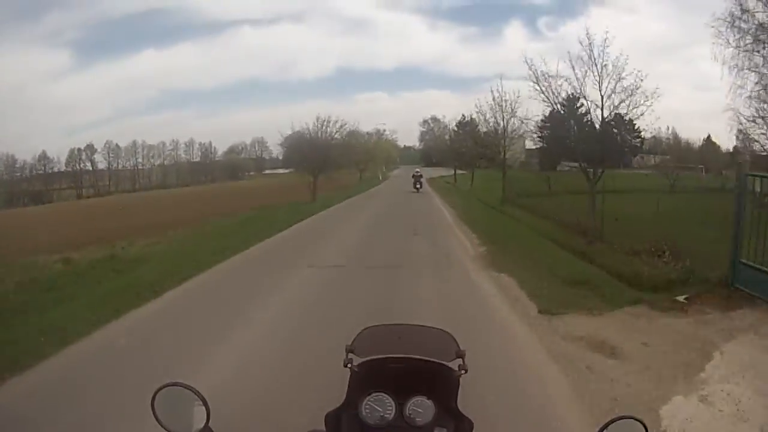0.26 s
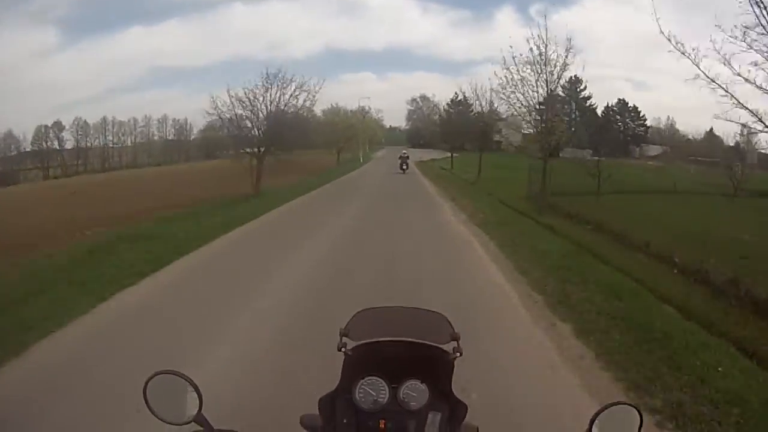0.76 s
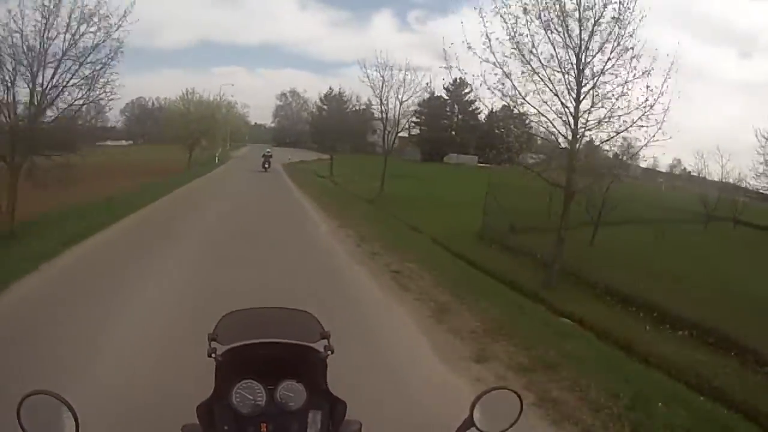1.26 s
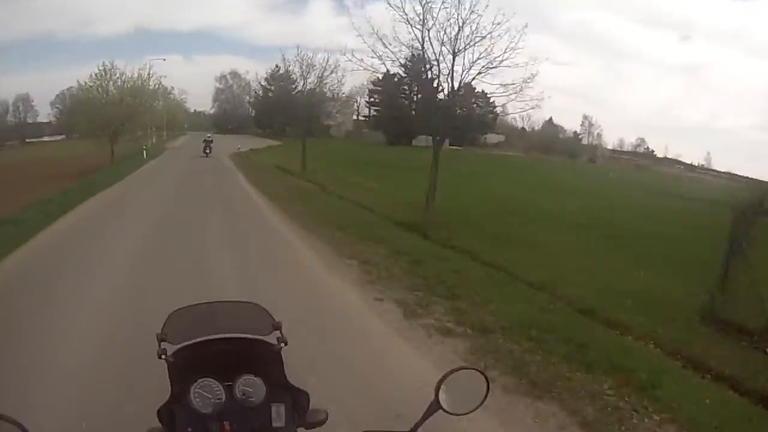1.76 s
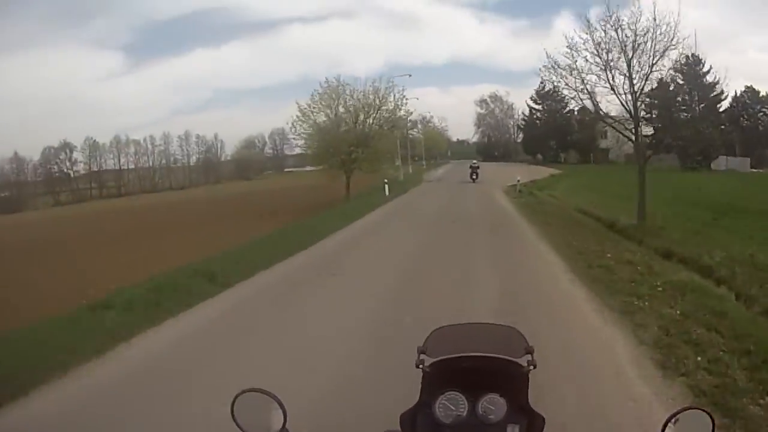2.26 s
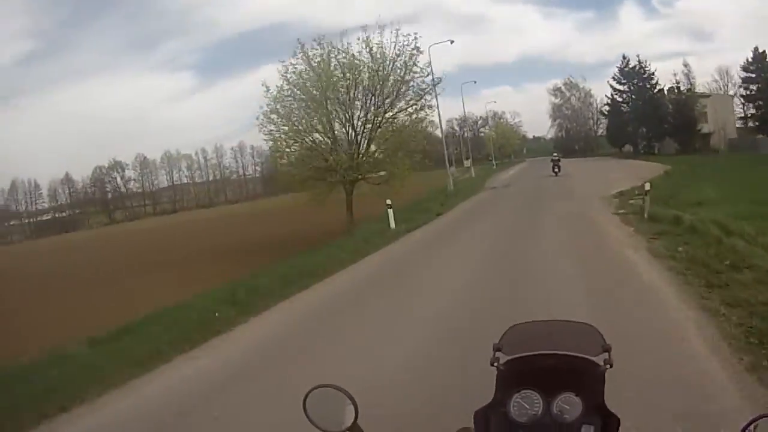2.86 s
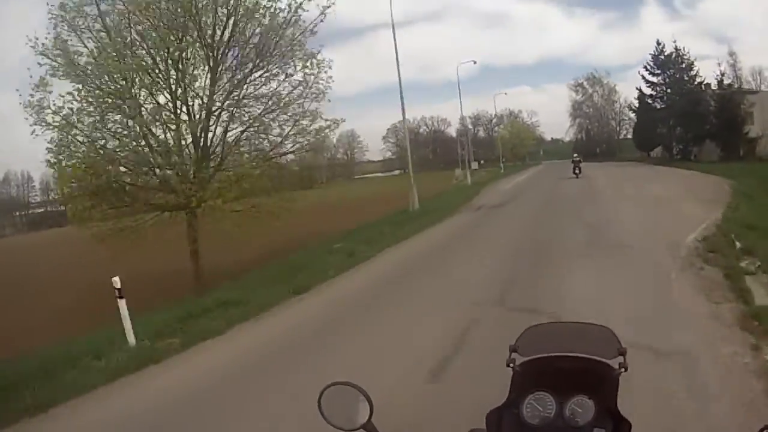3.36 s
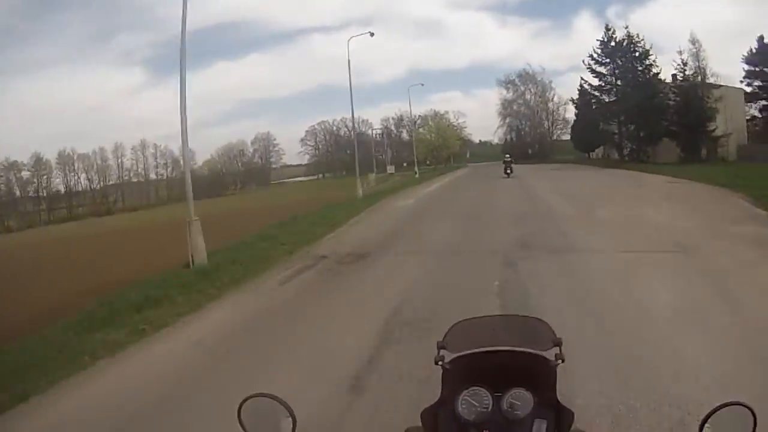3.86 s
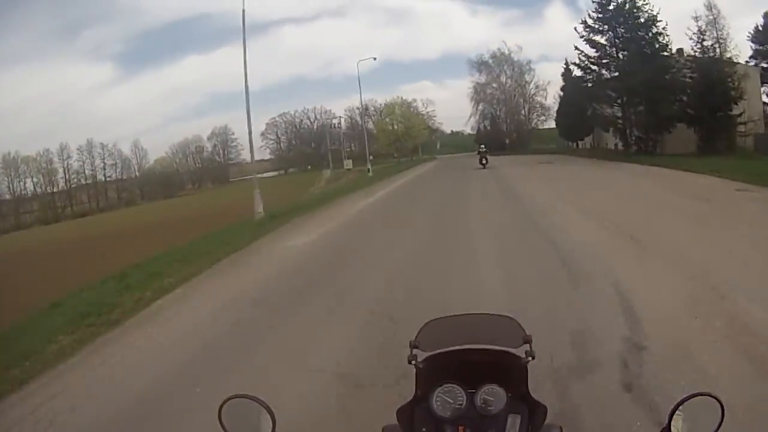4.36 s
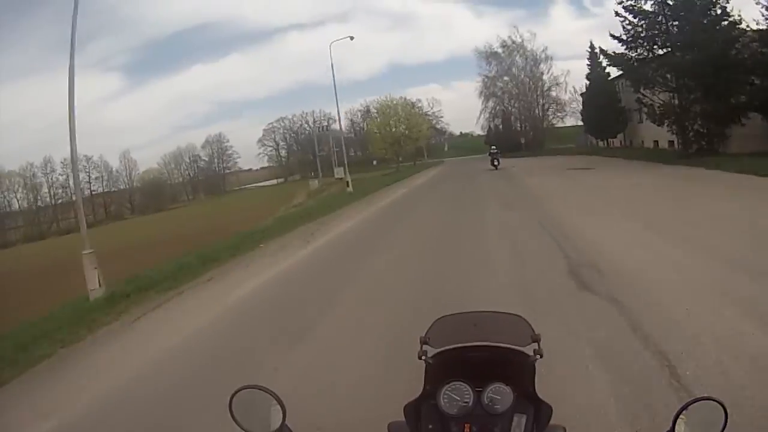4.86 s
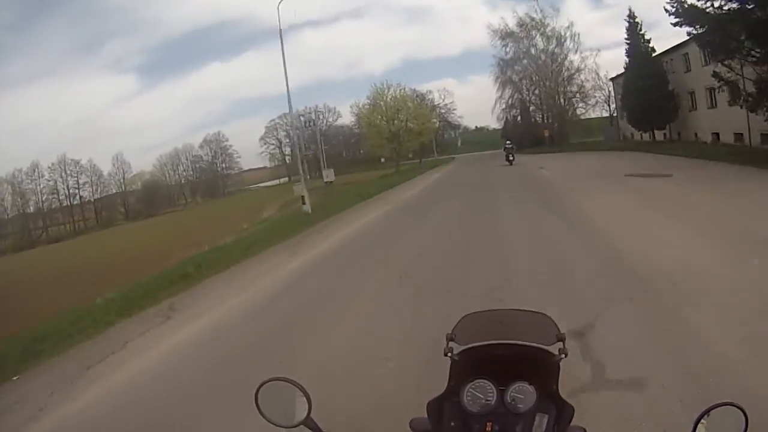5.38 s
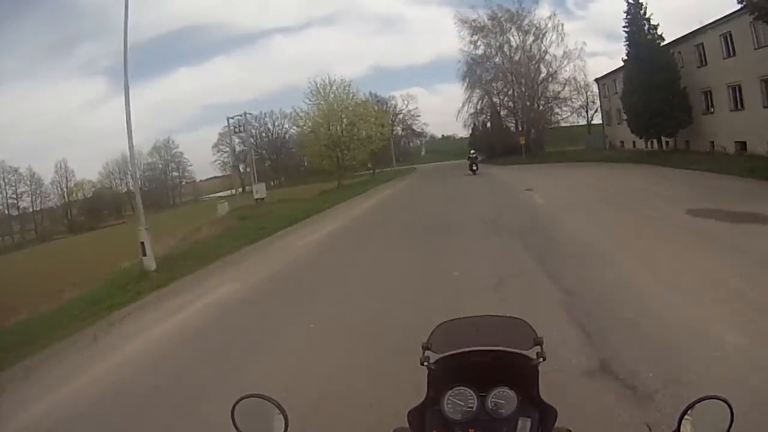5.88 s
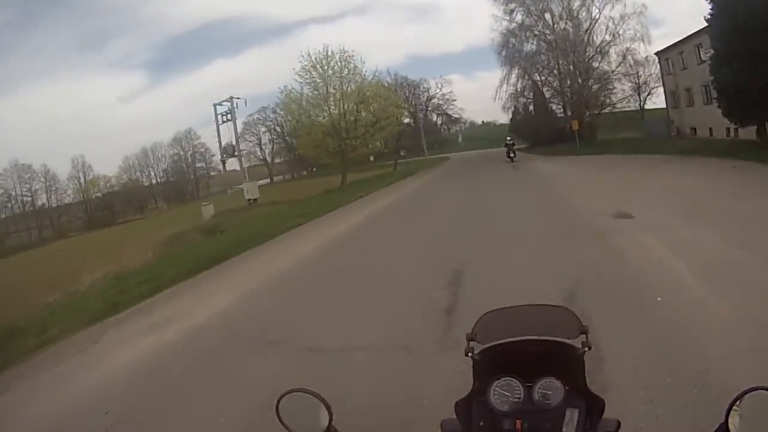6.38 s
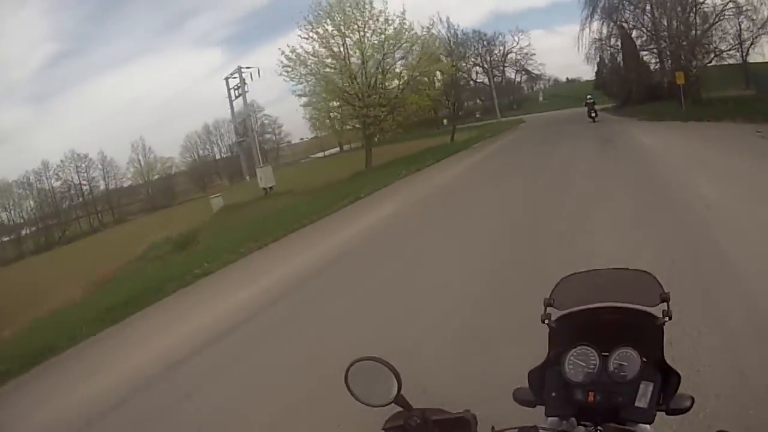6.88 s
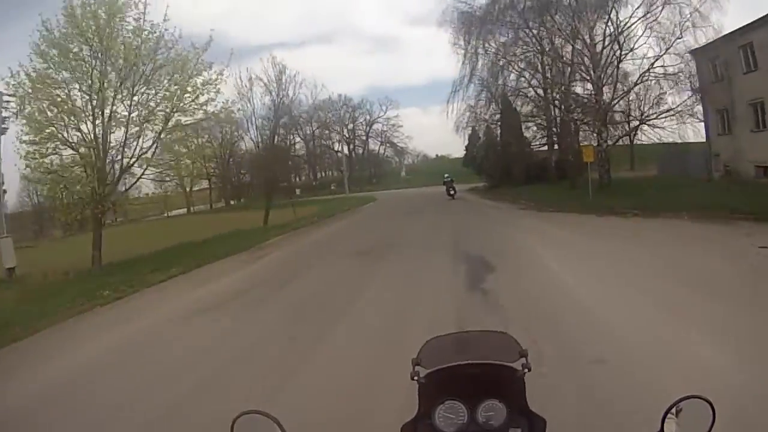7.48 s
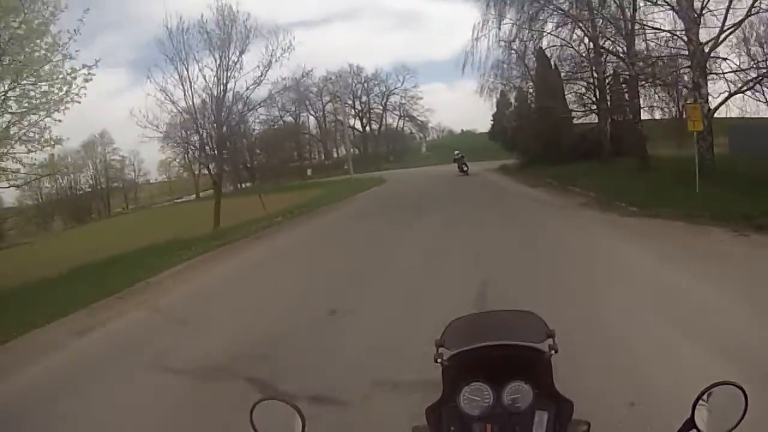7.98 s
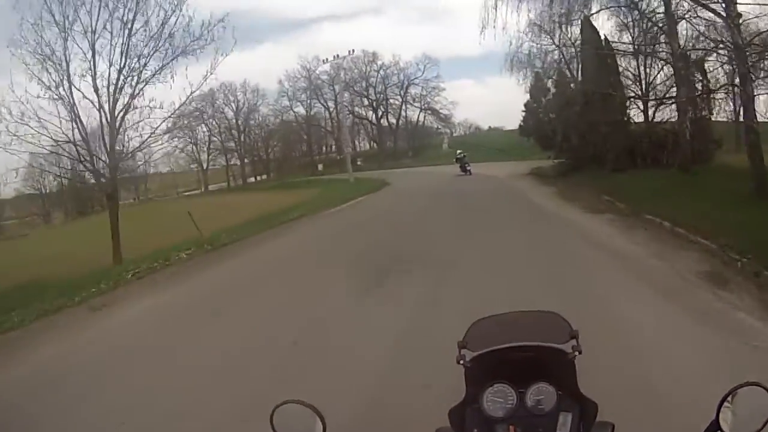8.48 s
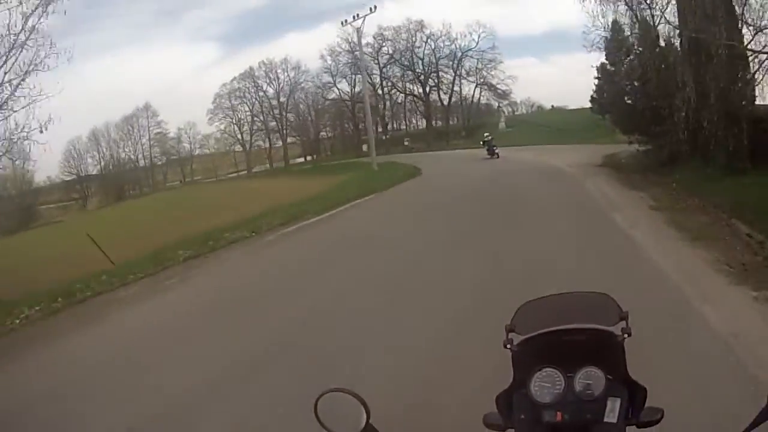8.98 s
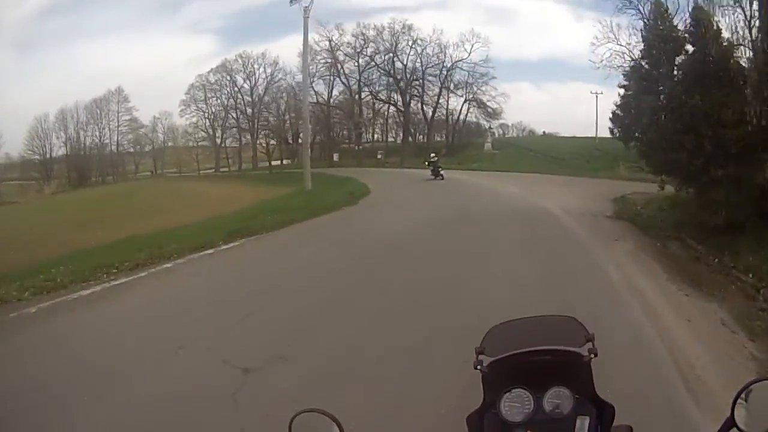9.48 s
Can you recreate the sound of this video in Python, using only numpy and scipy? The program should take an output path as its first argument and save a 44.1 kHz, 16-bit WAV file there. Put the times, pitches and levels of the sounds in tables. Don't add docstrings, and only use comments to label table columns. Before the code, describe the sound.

A mono, close and boxy sound from inside a sealed plastic housing on a moving motorcycle. Throughout, a low drone near 103 Hz shudders unevenly, surging and briefly choking, with soft thumps and thuds of buffeting air. Over it, wind rushes in a hollow, coloured noise with a thin hissy top, fullest from 0 to 3 seconds. A breathy whistle around 2.2 kHz swells from about 1.5 seconds and is prominent around 2.4 to 3.8. At 3.55 a hard, short plastic knock clacks. Shaking and wind then ease, lowest wind around 6 to 6.7, while tiny 9 kHz squeaks tick faintly between 4 and 8. The drone pulses strongly around 6.5 to 7. A dull low bump with a faint rattle lands at 7.9, amid somewhat renewed wind. It settles again, and barely audible, very high insect chirps come at 9.3, 9.45 and 9.64, with the ride continuing to the end.

```python
import sys
import numpy as np
from scipy import signal
from scipy.fft import rfft, irfft, next_fast_len
from scipy.io import wavfile
from scipy.ndimage import uniform_filter1d

SR = 44100
rng = np.random.default_rng(int(sys.argv[2]) if len(sys.argv) > 2 else 0)


def unload_wav(signal):
    wavfile.write(
        sys.argv[1],
        SR,
        np.round(np.clip(np.atleast_2d(signal).T, -1, 1) * 32767).astype(np.int16),
    )


def invert_db(level):
    return 10 ** (np.asarray(level, dtype=float) / 20)


N = 429093
TIME = np.arange(N) / SR

# time_s, wind_on_housing_db, side_wind_on_gap_db, mount_shaking_db
RIDE = [(0, -40.5, -1, -26), (.7, -38.5, -3, -27), (1.3, -38.5, 0.5, -27), (1.75, -41.5, 5.5, -26),
        (2.4, -40, 4, -28), (3.3, -39.5, 10.5, -26), (3.8, -44, 10, -28.5), (4.3, -44.5, 9, -32),
        (4.7, -47, 8, -36), (5.25, -43.5, 8, -30), (5.9, -52.5, 6.5, -33.5), (6.2, -51.5, -3, -34.5),
        (6.6, -52.5, 6, -33), (7.3, -48.5, -2.5, -33), (8.0, -46, 2, -29), (8.6, -49, 4, -33),
        (9.2, -50, 7, -34.5), (9.73, -53, 5.5, -33.5)]
# wind_db, side_wind_db, shaking_db
REFERENCE_DB = (-44, 4, -30)
LAYERS = {"mount": (-32, -0.01, 0.01, 1.01, 0.13), "thumps": (-33, 0, 0, 0.94, 0),
          "thuds": (-39.5, -0.13, -0.11, 0.98, .6), "buffet": (-42.5, .5, -.2, 0.14, 0.9),
          "whistle": (-40, 1.01, 0.87, -0.15, 0.34), "rush": (-35, 0.74, 0.02, -0.07, .95),
          "treble": (-47, 0.96, 0.12, 0.09, 0.76), "port": (-48, 1.06, -0.24, 0.01, 1.3),
          "air": (-68, 0.85, 0.34, 0.36, 0.8)}

# freq_hz, density_db (per Hz)
THUMP_COLOUR = [(6, -36), (11, -13), (18, -12), (26, -3), (75, 0), (125, 0), (150, -44)]
THUD_COLOUR = [(120, -31), (138, -2), (185, -1.5), (215, -5), (245, -13.5), (290, -18)]
BUFFET_COLOUR = [(215, -12), (250, 0.5), (420, -5.5), (470, -8), (900, -10), (1100, -26)]
RUSH_COLOUR = [(800, -35.5), (1050, -13), (1300, -8), (2000, -11), (2600, -11), (2800, -19.5), (3300, -21),
               (3800, -21)]
TREBLE_COLOUR = [(2800, 1), (3200, -3), (4400, -3.5), (5400, -0.5), (6100, -9), (7400, -11.5),
                 (8400, -15.5), (9500, -35), (11000, -45)]
AIR_COLOUR = [(7500, -26), (9500, -1), (10700, -3.5), (12000, -2.5), (12500, -11), (14000, -14),
              (15300, -25)]

# freq_hz, width_hz, level_db
BUFFET_MODES = [(250, 82, -13), (384, 47, -4), (649, 120, -11), (810.5, 33, -9.5)]
RUSH_MODES = [(1414, 162, -3), (1591, 144, -3.5), (1863, 143, -7), (2444, 66, -14.5), (2680, 50, -10.5)]
TREBLE_MODES = [(3896, 150, -7.5), (6010, 150, -19.5), (6060, 110, -19), (6560, 200, -14), (8200, 300, -25),
                (8870, 340, -22)]
PORT_MODES = [(4860, 22, -3), (4990, 27, 2), (5059, 60, 3.5), (5187, 55, 2.5), (4850, 650, -1)]
WHISTLE_MODES = [(2214, 220, -5), (2290, 137, -2)]

# centre_s, swell_db, length_s (between half heights)
SWINGS = [(0.62, 9, 0.05), (1.16, 10, 0.038), (1.43, 8, 0.033), (1.89, 3.5, 0.085), (2.66, 7, 0.11),
          (2.75, 8.5, 0.041), (3.2, 4, 0.026), (3.58, 4, 0.057), (3.91, 2, 0.12), (4.02, 7.5, 0.16),
          (4.18, 4.5, 0.06), (4.48, 0, 0.05), (5.1, 6, 0.1), (5.29, 4.5, 0.1), (5.38, 4.5, 0.11),
          (5.79, 5, 0.027), (5.98, 5, 0.03), (6.15, 6, 0.063), (6.48, 8, 0.079), (6.61, 10.5, 0.064),
          (6.71, 8, 0.04), (6.95, 9.5, 0.076), (7.55, 6.0, 0.037), (7.63, 6, 0.09), (8.03, 7, 0.053),
          (8.15, 6, 0.04), (8.45, 10, 0.032), (8.96, 8, 0.07), (9.13, 5.5, 0.08), (9.31, 5.5, 0.05)]
CHECKS = [(0.29, -5.5, 0.046), (0.74, -5.0, 0.05), (1.32, -11, 0.044), (1.62, -11, 0.04), (2.04, -6, 0.023),
          (2.18, -9, 0.03), (2.31, -2.5, 0.081), (2.39, -6.0, 0.074), (2.7, -10, 0.029),
          (3.02, -8.0, 0.018), (3.46, -5.5, 0.034), (3.78, -7.0, 0.07), (4.1, -13, 0.036),
          (4.25, -14.0, 0.043), (4.67, -11, 0.11), (4.76, -6, 0.05), (5.55, -12, 0.03), (5.71, -4, 0.07),
          (5.94, -13, 0.02), (6.1, -9.5, 0.04), (6.78, -3.5, 0.11), (6.88, -9, 0.087), (7.08, -6, 0.06),
          (7.47, -8.0, 0.044), (7.72, -11.0, 0.027), (7.87, -8.5, 0.05), (8.38, -9, 0.033),
          (8.88, -18, 0.044), (9.03, -13.0, 0.041), (9.53, -1, 0.09)]
ROLLS = [(1.14, 3, 0.09), (2.65, 4.5, 0.25), (3.99, -1, 0.1), (4.42, 6, 0.2), (4.87, -8, 0.14),
         (5.09, 6.5, 0.14), (5.39, 1, 0.16), (5.47, 2.5, 0.14), (6.77, -2, 0.19), (6.96, 3, 0.16),
         (7.03, 2, 0.16), (7.79, -5, 0.15), (8.13, 3, 0.24), (8.22, 5.5, 0.22), (8.58, -6.0, 0.12),
         (8.73, 3, 0.1)]
EDDIES = [(0.92, 8, 0.07), (1.49, 13.5, 0.15), (2.0, 8.5, 0.042), (2.53, 2, 0.2), (2.66, 4.5, 0.26),
          (2.73, 3.5, 0.26), (2.82, -6.5, 0.13), (3.46, 11, 0.06), (3.56, 10, 0.054), (3.81, -6, 0.057),
          (4.24, -16, 0.074), (5.26, 0, 0.16), (5.34, 6, 0.3), (6.21, 7, 0.1), (6.47, 6, 0.054),
          (6.68, 9, 0.072), (8.01, 11.5, 0.054), (8.79, 16, 0.05), (9.27, 8.5, 0.19), (9.36, 2.5, 0.13)]
GUSTS = [(0.144, 3.1, 0.06), (0.886, 1.3, 0.11), (1.308, 2.8, 0.44), (1.717, 0.5, 0.22), (1.95, 6, 0.11),
         (2.424, -2.0, 0.069), (2.7, 1.3, 0.17), (2.91, -1.9, 0.16), (3.114, 1, 0.091), (3.543, 1, 0.26),
         (3.99, 2.5, 0.11), (4.21, 1.4, 0.18), (4.653, 1.3, 0.13), (4.915, -1.5, 0.15), (5.06, 0.5, 0.19),
         (5.8, 2.1, 0.18), (5.954, -0.9, 0.27), (6.62, 2.5, 0.081), (6.78, -1.5, 0.085),
         (6.965, 1.7, 0.068), (7.27, 2.3, 0.1), (7.463, -3.5, 0.12), (7.533, 4, 0.041), (8.16, 3.5, 0.059),
         (8.94, 1, 0.28)]
FLICKS = [(.19, 2, .03), (.7, 1.5, .05), (2.6, 1.5, 0.035), (3.17, 2, 0.042), (5.07, 2.5, .04),
          (5.2, 1.5, .06), (6.53, -4, 0.044), (6.97, 1.5, .1), (7.35, 1, .04), (7.52, 2.5, .03),
          (7.63, 2, .04), (8.07, 4, .04), (8.105, -5, .025), (8.34, 2.5, 0.035)]
FLARES = [(0.36, 4, 0.16), (1.52, 4, 0.1), (2.39, 5, 0.24), (2.78, 4.5, 0.1), (3.42, 3, .15),
          (3.77, 2, 0.15), (5.09, 1.5, 0.23), (6.2, 4, 0.08), (6.82, 2, .08), (6.93, 9.5, 0.069),
          (7.31, 3, 0.15), (8.23, 0.5, 0.14), (9.34, -1.5, 0.18)]

# start_s, peak_db, ring_hz, t60_s
KNOCKS = [
    (3.5535, -22, 1400, 0.035),
    (3.5575, -16.5, 300, 0.029),
    (3.5575, -21.5, 590, 0.022),
    (3.557, -16, 1060, 0.017),
    (3.5545, -18, 1640, .015),
    (3.557, -28, 3600, .012),
    (3.5575, -26, 1900, .015),
    (7.891, -18.5, 155, 0.056),
    (7.9105, -27, 1460, 0.02),
]
# start_s, level_db (the tone peaks 6 dB lower, before flutter), pitch_hz
SQUEAKS = [(3.9672, -59, 9220), (4.042, -61, 9230), (4.6242, -54, 9250), (5.0377, -60, 9250),
           (6.2642, -62, 9240), (6.5747, -60, 9410), (6.8322, -62, 9370), (7.0367, -61, 9360),
           (7.345, -60, 9280), (8.0808, -57, 9180)]
# start_s, level_db, length_s
CHIRPS = [
    (9.285, -76, 0.035),
    (9.452, -70, 0.028),
    (9.639, -72, .04),
]


def unit(x):
    return x / np.sqrt(np.mean(x ** 2))


def columns(table):
    s, *rest = np.transpose(table)
    return [np.interp(TIME, s, c) for c in rest]


def walk(rate):
    hold = int(SR / rate)
    steps = np.repeat(rng.standard_normal(N // hold + 1), hold)
    slewed = uniform_filter1d(uniform_filter1d(steps, hold), hold)
    return unit(slewed[:N])


def swells(table):
    coarse = TIME[::64]
    level_db = 0
    for s, db, length in table:
        level_db = level_db + db * np.exp(-np.log(16) * ((coarse - s) / length) ** 2)
    return np.interp(TIME, coarse, level_db)


def layer_db(name):
    db, *shares = LAYERS[name]
    drives = [c - ref for c, ref in zip(columns(RIDE), REFERENCE_DB)] + [swells(GUSTS)]
    return db + sum(share * drive for share, drive in zip(shares, drives))


def ring(x, hz, width_hz):
    return signal.lfilter(*signal.iirpeak(hz, hz / width_hz, SR), x)


def coloured(points):
    hz, db = np.transpose(points)
    size = next_fast_len(N)
    bin_hz = np.arange(size // 2 + 1) * SR / size
    gain = invert_db(np.interp(np.log(bin_hz + 1), np.log(hz), db, left=-140, right=-140))
    return unit(irfft(rfft(rng.standard_normal(size)) * gain, size)[:N])


def modes(table, flicker_db, rate):
    out = 0
    for hz, width_hz, db in table:
        pass_hz = 1.55 * width_hz
        tone = ring(ring(rng.standard_normal(N), hz, pass_hz), hz, pass_hz)
        out = out + invert_db(db + flicker_db * walk(rate)) * unit(tone)
    return out


def add(out, s, sound):
    i = int(s * SR)
    out[i:i + len(sound)] += sound[:N - i]


def drone():
    mount_hz, wander_hz, jitter_hz = 103, 2, 5
    hz = mount_hz + wander_hz * walk(9) + jitter_hz * walk(30)
    swing = np.sqrt(2) * np.sin(2 * np.pi * np.cumsum(hz) / SR)
    pushes = invert_db(-9) * unit(ring(ring(rng.standard_normal(N), mount_hz, 45), mount_hz, 45))
    check_db, eddy_db = swells(CHECKS), swells(EDDIES)

    flutter = invert_db(2.5 * walk(34) + 0.85 * walk(22))
    mount_db = layer_db("mount") + swells(SWINGS) + 1.05 * check_db
    mount = invert_db(mount_db) * (flutter * swing + pushes)

    thump_db = layer_db("thumps") + 0.5 * check_db + 0.15 * eddy_db + 0.75 * swells(ROLLS)
    thumps = invert_db(thump_db + 1.2 * walk(14)) * coloured(THUMP_COLOUR)
    thud_db = layer_db("thuds") + 0.65 * eddy_db
    thuds = invert_db(thud_db + 2.4 * walk(22)) * coloured(THUD_COLOUR)
    return mount + thumps + thuds


def wind():
    gust, flick_db = walk(24), swells(FLICKS)

    buffet = invert_db(1.5 * walk(12) + 0.44 * gust) * coloured(BUFFET_COLOUR) + modes(BUFFET_MODES, 1.46, 12)
    buffet = invert_db(layer_db("buffet") + 0.12 * swells(EDDIES)) * unit(buffet)

    rush = invert_db(0.74 * gust + 0.36 * flick_db) * (coloured(RUSH_COLOUR) + modes(RUSH_MODES, 1.0, 12))
    rush = invert_db(layer_db("rush")) * unit(rush)

    treble = invert_db(layer_db("treble")) * unit(coloured(TREBLE_COLOUR) + modes(TREBLE_MODES, 0.18, 7))
    port = invert_db(layer_db("port")) * unit(modes(PORT_MODES, 0.93, 16))
    air = invert_db(layer_db("air")) * coloured(AIR_COLOUR)
    top_flicker = invert_db(0.66 * gust + 0.51 * walk(40) + 0.5 * walk(12) + flick_db)
    top = top_flicker * (treble + port + air)

    whistle = invert_db(0.37 * gust + 1.2 * walk(5.8) + swells(FLARES)) * modes(WHISTLE_MODES, 1.3, 14)
    whistle = invert_db(layer_db("whistle")) * unit(whistle)
    return buffet + whistle + rush + top


def hiss():
    return invert_db(-81) * coloured(AIR_COLOUR)


def knocks():
    out, t = np.zeros(N), TIME[:SR // 8]
    for s, db, hz, t60 in KNOCKS:
        add(out, s, invert_db(db - 60 * t / t60) * np.sin(2 * np.pi * hz * t))
    return out


def squeaks():
    length_s, tail_s, tail_db = 0.024, 0.025, -7
    upper_hz, upper_db = 13500, -20
    out, t = np.zeros(N), TIME[:SR // 8]
    tail = invert_db(tail_db) * np.exp(-np.abs(t - length_s) / tail_s)
    shape = np.where(t < length_s, 1, tail)
    upper = invert_db(upper_db) * np.sin(2 * np.pi * upper_hz * t)
    for s, db, hz in SQUEAKS:
        add(out, s, invert_db(db - 6.0) * shape * (np.sin(2 * np.pi * hz * t) + upper))
    return out * invert_db(1.5 * walk(200))


def insect():
    scrape = rng.standard_normal(N) * (1 + 0.6 * np.sin(2 * np.pi * 160 * TIME))
    tone = unit(ring(ring(ring(scrape, 13700, 900), 13500, 900), 13600, 1000))
    trains = np.zeros(N)
    for s, db, length in CHIRPS:
        ramp = 3.2 * (1 - np.abs(2 * (TIME - s) / length - 1))
        trains += invert_db(db) * np.clip(ramp, 0, 1)
    return tone * trains


def scene():
    mix = drone() + wind() + hiss() + knocks() + squeaks() + insect()
    return mix[None]


def low_pass(x):
    return signal.sosfilt(signal.butter(12, 15070, fs=SR, output="sos"), x)


def record(dry):
    return low_pass(dry)


dry = scene()
out = record(dry)
unload_wav(out)
```